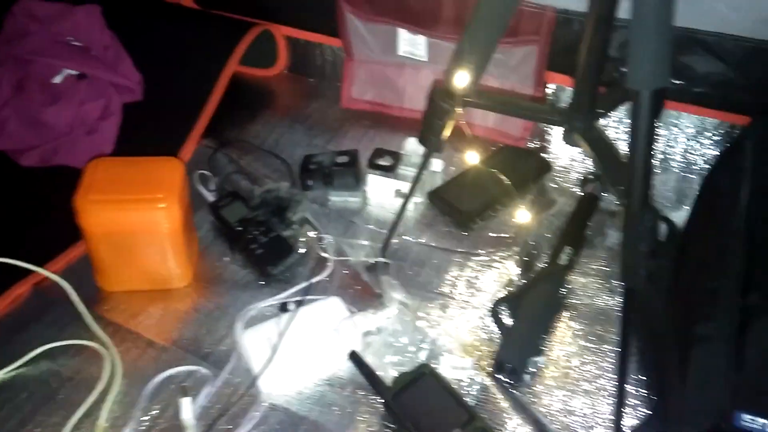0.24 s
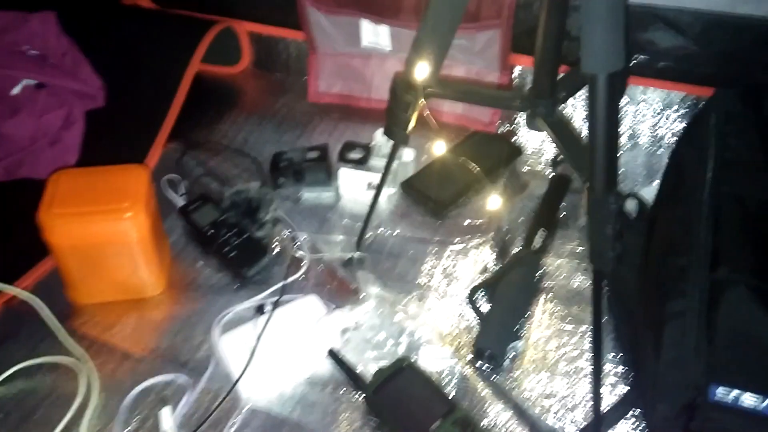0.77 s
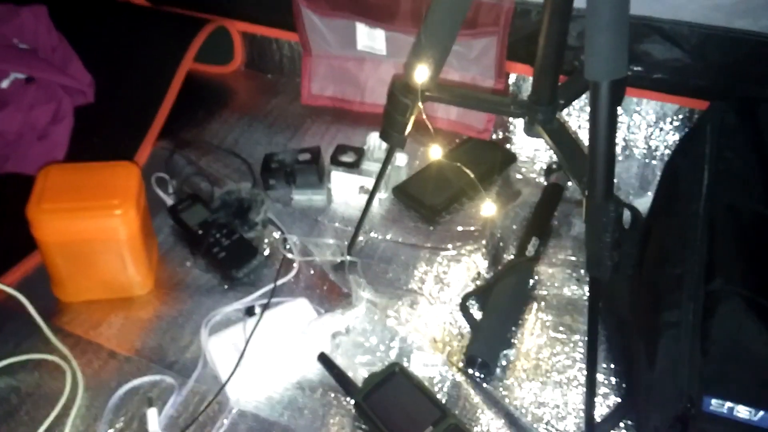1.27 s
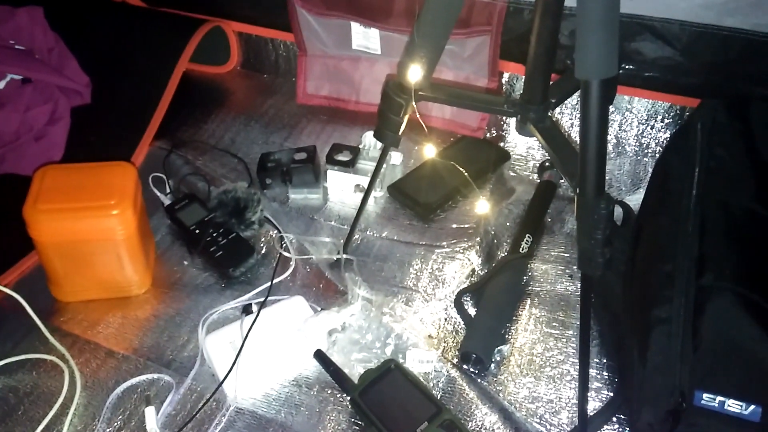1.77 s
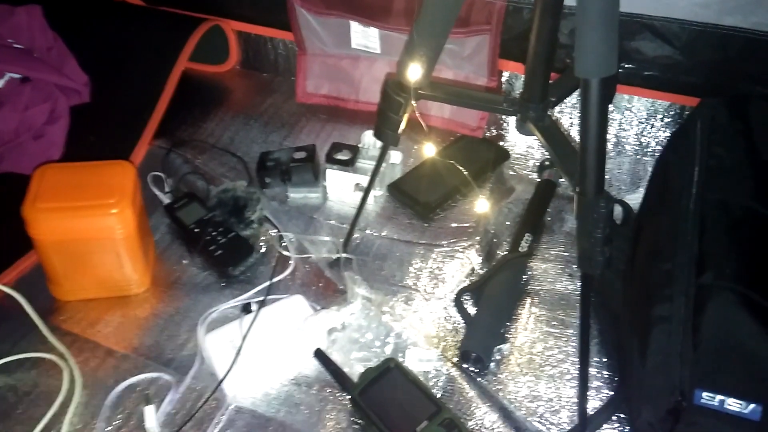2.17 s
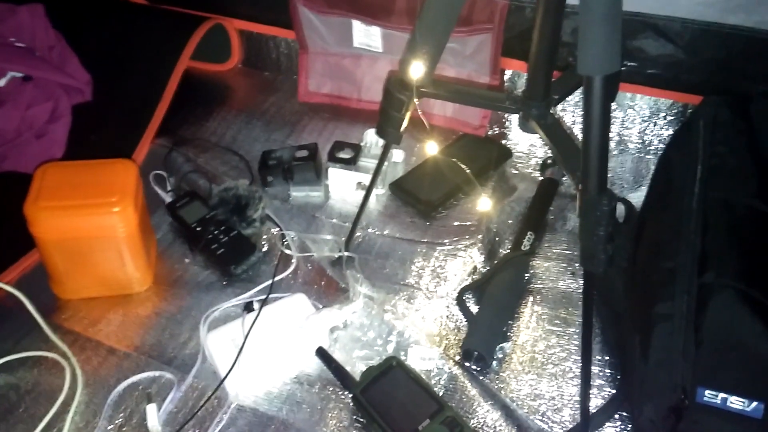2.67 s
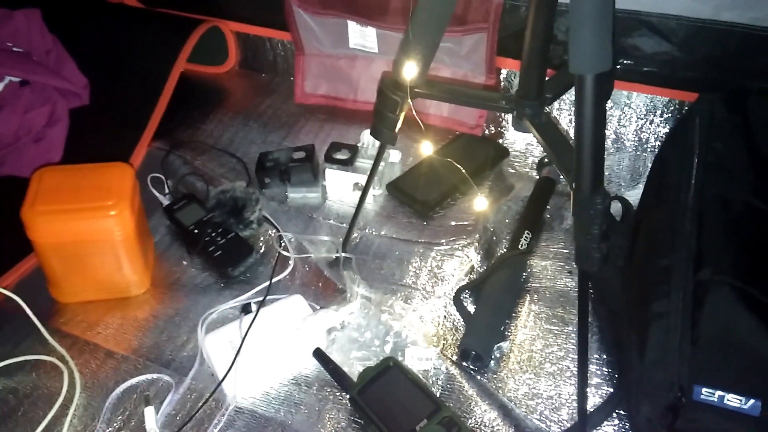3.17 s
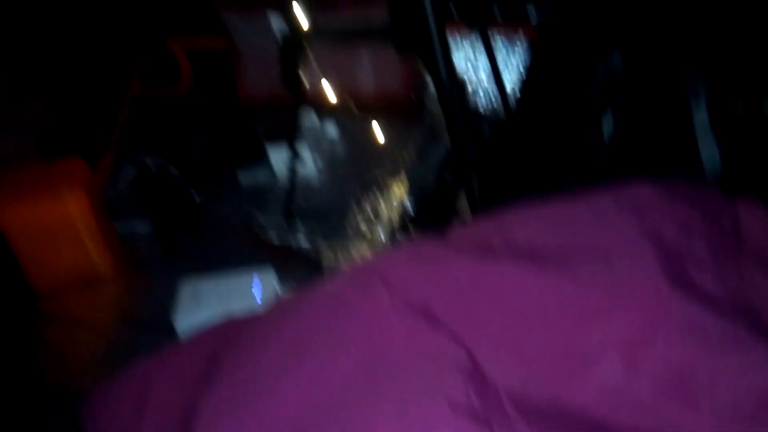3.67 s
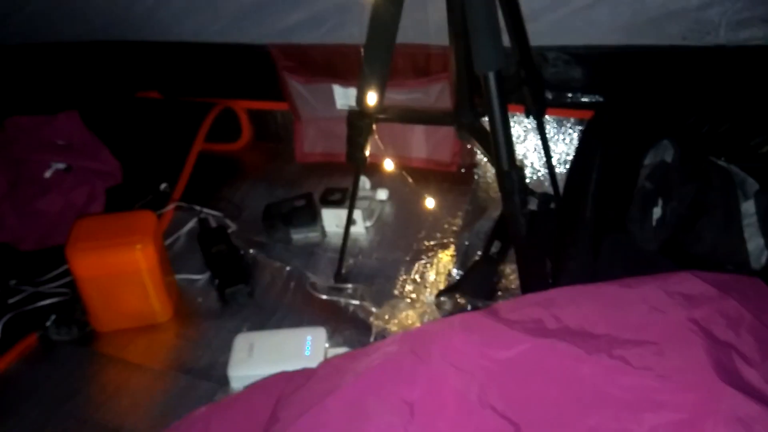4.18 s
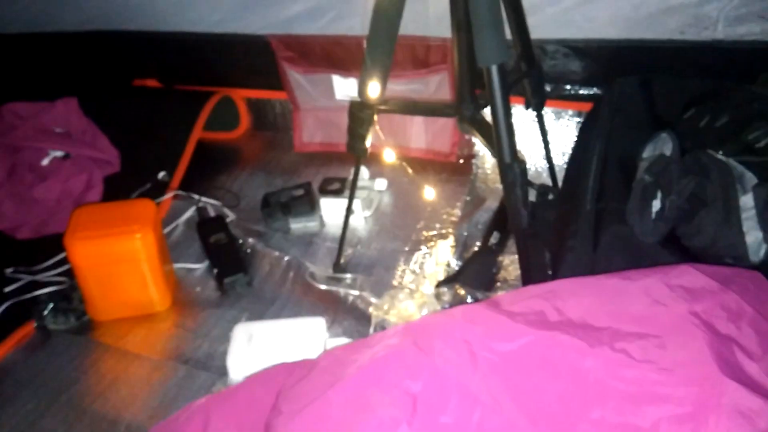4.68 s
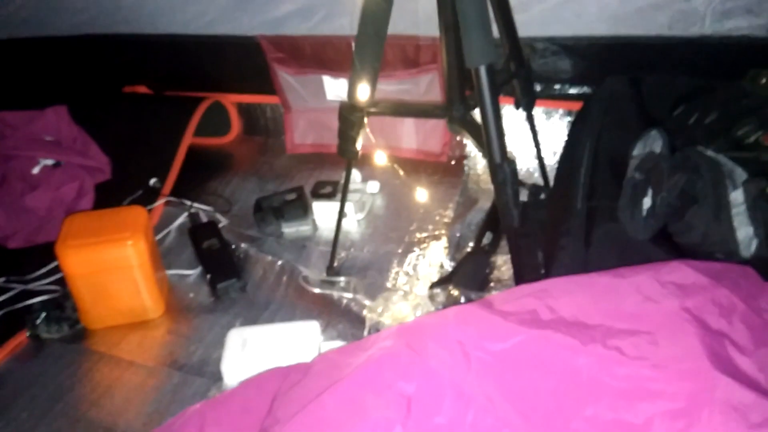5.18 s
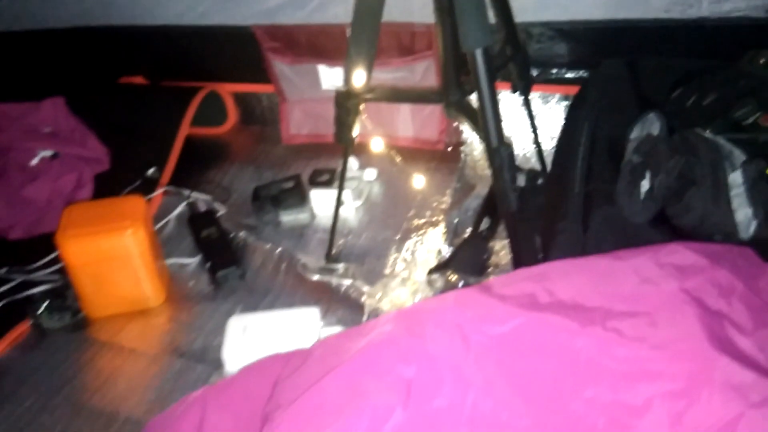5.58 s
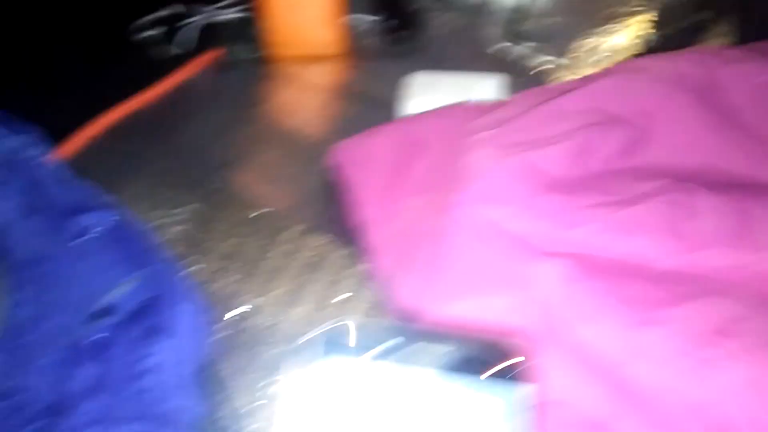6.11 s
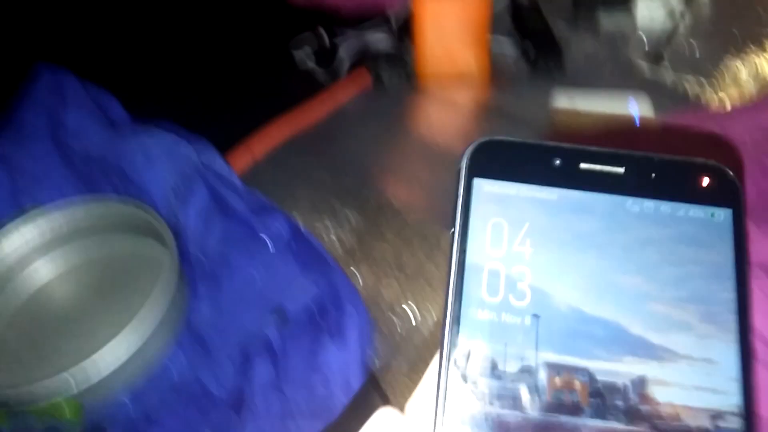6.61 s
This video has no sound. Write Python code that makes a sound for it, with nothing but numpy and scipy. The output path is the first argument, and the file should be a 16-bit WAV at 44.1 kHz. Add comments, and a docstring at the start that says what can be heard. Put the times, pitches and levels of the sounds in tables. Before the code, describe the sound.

From a microphone inside a tent, a downpour beats densely on the outer sheet, mixed with hollow plops from large drops and splashy bursts of spray. It stops abruptly for a moment, then a quieter, smooth rain hiss takes over. Close drips hit the fabric in a quick run of smacks and dull snaps, growing softer over a faint rustle of wet cloth.

```python
"""Rain on a tent at night

From inside, heavy rain drums on the fly, the tent's tight outer sheet. Near drops plop
and tick, and the spray they throw up makes a bright sizzle. The sound breaks off for
half a second and returns as lighter, hissing rain. Now fat drips smack the fabric close
by, making it sag, flutter, snap back and swing."""
import sys
import numpy as np
from scipy import signal
from scipy.fft import rfft, irfft
from scipy.io import wavfile
from scipy.ndimage import uniform_filter1d

SR = 44100
rng = np.random.default_rng(int(sys.argv[2]) if len(sys.argv) > 2 else 0)


def generate_wav(sig):
    """Save sig (samples, or channels by samples) to the path in sys.argv[1] as 16-bit PCM at SR."""
    pcm = np.round(np.clip(np.atleast_2d(sig).T, -1, 1) * 32767).astype(np.int16)
    wavfile.write(sys.argv[1], SR, pcm)


N = 302085
TIME = np.arange(N) / SR
BREAK_START_S, BREAK_END_S = 3.413, 3.934

# How hard the rain drums as gusts come and go. Each row: time in seconds, relative level in dB.
PATTER_LEVEL = [(0, -31), (.21, -31), (.28, -34.5), (.39, -31), (.86, -32), (1.15, -33), (1.33, -31),
                (1.51, -35), (1.65, -30), (1.85, -32.5), (2.27, -32), (2.58, -34), (2.77, -31),
                (2.86, -33.5), (3.36, -31)]
# The tone of the fly when drops hit it. Each row: frequency in Hz, relative level in dB.
FLY_TONE = [(25, -27), (55, -2.5), (120, -5), (190, -7), (300, -3.5), (410, -3.5), (580, 0), (980, -2),
            (1250, -7.5), (2100, -8.5), (2850, -7.5), (3300, -11.5), (5000, -14.5), (12000, -34.5)]
# How strongly single drops ring. Each row: pitch in Hz, relative level in dB.
PLOP_STRENGTH = [(250, -3), (320, 2), (410, -5), (580, 0), (980, 1), (1250, -2.5), (1700, -3), (2050, -5.5),
                 (2350, -4), (2650, -5.5), (2900, -1.5), (3300, -9.5), (5000, -5.5)]
# Sheets of water hitting the fly. Each row: start in seconds, length in seconds, relative level in dB.
SPLASHES = [(0, 0.052, -35.5), (0.22, 0.071, -31), (0.358, 0.13, -30), (0.552, 0.024, -27.5),
            (0.614, 0.073, -42), (.82, 0.11, -33), (1.258, 0.29, -31.5), (1.617, 0.028, -28),
            (1.929, 0.031, -28.5), (2.051, 0.073, -32.5), (2.33, 0.059, -32.5), (2.488, .02, -32),
            (2.687, .115, -30.5), (2.965, 0.08, -31.5), (3.106, .02, -30.5), (3.266, .012, -26),
            (3.297, 0.069, -31)]
# The tone of the spray. Each row: frequency in Hz, relative level in dB.
SIZZLE_TONE = [(2000, -29.5), (4500, -19.5), (5600, -10), (6400, -7), (7150, 1), (7600, 0), (8400, -7),
               (9500, -15.5), (10800, -23), (12500, -29.5), (14500, -28.5)]
# The downpour's largest drops. Each row: start in seconds, relative level in dB, plop pitch in Hz.
BIG_DROPS = [(0.159, -15.5, 537), (0.198, -17, 904), (0.449, -18, 390), (0.609, -16.5, 630),
             (0.631, -16.5, 1720), (0.789, -14, 950), (1.304, -17.5, 570), (1.42, -16, 694),
             (1.438, -14, 550), (1.533, -13.5, 643), (1.61, -15, 334), (1.661, -15, 1030),
             (1.939, -18.5, 1590), (2.055, -17, 713), (2.23, -13, 465), (2.479, -15, 674),
             (2.538, -18, 665), (2.728, -16, 630), (3.139, -19.5, 1080), (3.319, -15, 580)]
# The lighter rain eases for a second, then picks up. Each row: time in seconds, hiss level in dB.
HISS_LEVEL = [(3.93, -31), (4.55, -32), (4.85, -30.5), (5.11, -31), (5.17, -34), (5.42, -36), (5.72, -35),
              (5.93, -36), (6.09, -35.5), (6.16, -28), (6.44, -31), (6.85, -31.5)]
# How the lighter rain's tone changes. Each row: time in seconds, centre of the hiss in Hz,
# level of the wash in dB, boost of the highest treble in dB.
LIGHT_RAIN_CHANGES = [(3.93, 5970, -35.5, -0.5), (4.3, 6280, -36, 0), (4.7, 6450, -35, -0.5),
                      (5.05, 6460, -35.5, -2.5), (5.17, 6600, -39.5, 3.5), (5.27, 6960, -50, 1),
                      (6.08, 6920, -51, 2), (6.16, 6960, -46, 1), (6.85, 6900, -47.5, 4)]
# The tone of the hiss when centred on HISS_CENTRE_HZ. Each row: frequency in Hz, relative level in dB.
HISS_TONE = [(2000, -21), (3600, -29), (5000, -21), (5700, -6), (6450, 2), (6950, 5), (7700, 0),
             (8600, -4.5), (10000, -10.5), (12000, -17), (14500, -20.5)]
HISS_CENTRE_HZ = 6900
# The tone of the broad wash under the hiss. Each row: frequency in Hz, relative level in dB.
WASH_TONE = [(25, -2), (55, 11.5), (110, 8), (400, -2), (1000, -2.5), (2500, 1), (3500, 2.5), (4600, 4.5),
             (5600, 6.5), (7000, 0), (9000, -29), (14000, -18)]
# Fat drips landing on the fly. Each row: start in seconds, smack in dB, length of the sag in seconds,
# flutter in dB, snap in dB, swing in dB. All four levels are relative.
DRIPS = [(4.044, -10, 0.0058, -46, -52, -48), (4.1778, -14.5, 0.017, -29.5, -14, -33),
         (4.3156, -14, 0.012, -34, -25, -36), (4.4448, -16.5, 0.013, -35, -39, -37),
         (4.5623, -17, 0.015, -25.5, -26, -34), (4.6926, -16, .0138, -43, -22, -31),
         (4.8337, -14.5, 0.017, -41, -17, -41), (4.976, -13.5, 0.036, -34.5, -34, -33),
         (5.1345, -18, 0.051, -40.5, -19, -39), (5.3346, -25, .0138, -41.5, -30, -41),
         (5.5623, -22.5, 0.026, -43, -22, -33), (5.646, -34, 0.0049, -47, -35, -36),
         (5.8064, -26, 0.014, -45, -22.5, -35), (5.8597, -28, .0316, -50, -28.5, -38),
         (5.9384, -35, 0.026, -51, -28, -36), (6.0453, -36, 0.0027, -55, -42, -39),
         (6.253, -39, .003, -55, -50, -45), (6.3012, -43, 0.016, -58, -27, -44),
         (6.666, -33, 0.0019, -52, -39, -37), (6.7786, -37, 0.0087, -47, -55, -59)]
# Slack fabric flapping with no drip on it. Each row: start in seconds, snap and swing in relative dB.
LONE_FLAPS = [(5.4213, -29.5, -34.5), (5.606, -23.5, -33), (6.1094, -35, -41), (6.1874, -27, -43),
              (6.5574, -51, -36), (6.616, -46, -34.5)]


def from_db(db):
    """Turn decibels into a number to multiply a sound by."""
    return 10 ** (np.asarray(db) / 20)


def rms_one(x):
    """Scale a sound so its average strength (rms) is 1."""
    return x / np.sqrt(np.mean(x ** 2) + 1e-20)


def in_time(rows):
    """Join a table's rows with straight lines, giving each column a value at every sample."""
    times, *columns = np.transpose(rows)
    return [np.interp(TIME, times, column) for column in columns]


def at_hz(tone, hz):
    """Look up a tone table's level in dB at the given frequencies."""
    points, db = np.transpose(tone)
    return np.interp(np.log(np.maximum(hz, 1)), np.log(points), db)


def add(out, start_s, sound):
    """Mix a short sound into out at the given time."""
    part = out[round(start_s * SR):][:len(sound)]
    part += sound[:len(part)]


def drift(rate):
    """A smooth random wobble of strength 1; a higher rate makes it quicker."""
    count = int(6 * rate * N / SR) + 4
    smooth = np.convolve(rng.standard_normal(N // 20)[:count], np.hanning(7), "same")
    return rms_one(np.interp(np.linspace(0, count - 1, N), np.arange(count), smooth))


def through(x, response):
    """Make every click in x set off a copy of the response."""
    return signal.oaconvolve(x + 1e-18, response)[:N]


def body(tone, size=4096):
    """The short sound that something with this tone makes when tapped once."""
    hz = np.arange(size // 2 + 1) * SR / size
    cepstrum = irfft(np.log(from_db(at_hz(tone, hz))))
    # fold the second half onto the first, so nothing sounds before the tap
    cepstrum[1:size // 2] *= 2
    cepstrum[size // 2 + 1:] = 0
    response = irfft(np.exp(rfft(cepstrum)))
    return response / np.linalg.norm(response)


def shower(per_s, spread_db):
    """Clicks at random times, like falling drops; spread_db sets how much their sizes vary."""
    sizes = from_db(spread_db * np.minimum(rng.exponential(1, N), 2.15))
    return sizes * rng.choice([-1, 1], N) * (rng.random(N) < per_s / SR)


def swing(hz, t60, size=8192):
    """A swing that comes to rest. Here and below, t60 is the seconds it takes to fade by 60 dB."""
    return np.sin(2 * np.pi * hz * TIME[:size]) * from_db(-60 * TIME[:size] / t60)


def fabric_tap(t60, ring_db, size=4096):
    """One spot on the fly is hit: a click, then the fabric's short, uneven ringing."""
    tail = rng.standard_normal(size) * from_db(-60 * TIME[:size] / t60)
    response = from_db(ring_db) * tail / np.linalg.norm(tail)
    response[0] += 1
    return response / np.linalg.norm(response)


def patter(spots=12):
    """Countless drops drum on different spots of the fly, the nearer ones as separate plops."""
    level_db, = in_time(PATTER_LEVEL)
    drops = shower(per_s=900, spread_db=3.0)
    spot = rng.integers(0, spots, N)
    taps = sum(through(drops * (spot == k), fabric_tap(t60=0.054, ring_db=-0.5)) for k in range(spots))
    drumming = rms_one(through(taps, body(FLY_TONE)))
    return from_db(level_db - 3.0) * drumming + from_db(level_db - 2.5) * plops()


def ring(clicks, hz, t60):
    """Each click starts a pure note that dies away."""
    decay = from_db(-60 / (t60 * SR))
    angle = 2 * np.pi * hz / SR
    return signal.lfilter([0, np.sin(angle)], [1, -2 * decay * np.cos(angle), decay ** 2], clicks + 1e-18)


def plops(t60_at_1khz=0.061, count=56):
    """Each drop rings at one of many pitches; low plops last longer than high ticks."""
    pitches = np.geomspace(250, 5000, count) * np.exp(rng.normal(0, .01, count))
    drops = shower(per_s=1000, spread_db=5.5)
    chosen_pitch = rng.integers(0, count, N)
    out = np.zeros(N)
    for k, hz in enumerate(pitches):
        t60 = t60_at_1khz * (1000 / hz) ** 0.2
        gain = from_db(at_hz(PLOP_STRENGTH, hz)) / np.sqrt(t60)
        out += gain * ring(drops * (chosen_pitch == k), hz, t60)
    return rms_one(signal.sosfilt(signal.butter(2, 200, "high", fs=SR, output="sos"), out))


def splash_strength(rise_s=0.0023, sink_db_per_s=13.5, t60=0.14):
    """Each splash jumps up, sinks while it lasts and dies away; small spatters land at random."""
    spatter = from_db(-35.5 - 60 * TIME[:SR // 4] / 0.1)
    power = through(np.abs(shower(per_s=21, spread_db=2.0)), spatter ** 2)
    for start_s, length_s, db in SPLASHES:
        age = np.maximum(TIME - start_s, 0)
        fall_db = sink_db_per_s * age + 60 * np.clip(age - length_s, 0, 1) / t60
        power += (np.minimum(age / rise_s, 1) * from_db(db - fall_db)) ** 2
    return np.sqrt(np.abs(power))


def sizzle(steady_db=-32.5):
    """Fine spray thrown up by the drops comes in quick clumps and swells with each splash."""
    spray = through(shower(per_s=20000, spread_db=2.5), body(SIZZLE_TONE))
    strength = np.hypot(from_db(steady_db), splash_strength())
    return strength * rms_one(spray * from_db(0.85 * drift(rate=30)))


def big_drops():
    """A large drop gives a dull tap on the fly, a hollow plop and a wet splat."""
    taps, rings, splats = np.zeros((3, N))
    for start_s, db, hz in BIG_DROPS:
        add(taps, start_s + 0.0018, from_db(db + 9.5) * fabric_tap(t60=0.05, ring_db=2.5))
        add(rings, start_s + 0.003, from_db(db - 9.0) * swing(hz, t60=0.043))
        add(splats, start_s + 0.002, from_db(db + 11.0) * fabric_tap(t60=0.068, ring_db=7.0))
    dull = signal.butter(2, 1500, fs=SR, output="sos")
    wet = signal.butter(2, [1400, 2300], "band", fs=SR, output="sos")
    return signal.sosfilt(dull, through(taps, body(FLY_TONE))) + rings + signal.sosfilt(wet, splats)


def light_rain():
    """A smooth, far hiss creeps up in pitch, over a broad wash of drops that ebbs away."""
    centre_hz, wash_db, boost_db = in_time(LIGHT_RAIN_CHANGES)
    hiss_db, = in_time(HISS_LEVEL)
    # cut noise into short slices, so each can have its own tone
    hz, times, slices = signal.stft(rng.standard_normal(N), SR, nperseg=256)
    pitch_ratio = np.interp(times, TIME, centre_hz) / HISS_CENTRE_HZ
    treble_db = np.interp(hz, [7500, 12000], [0, 1])[:, None] * np.interp(times, TIME, boost_db)
    tone_db = at_hz(HISS_TONE, hz[:, None] / pitch_ratio) + treble_db
    hiss = signal.istft(slices * from_db(tone_db), SR)[1][:N]
    hiss = rms_one(hiss * from_db(0.85 * drift(rate=27)))
    wash = rms_one(through(shower(per_s=12000, spread_db=3.0), body(WASH_TONE)))
    return from_db(hiss_db) * hiss + from_db(wash_db) * wash


def stirring(rustle_db=-51.5, fade_db_per_s=1.5, billow_db=-53.0):
    """The wet fabric keeps rustling, ever more softly, while a slack panel billows."""
    band = signal.butter(1, [120, 650], "band", fs=SR, output="sos")
    dull = signal.butter(2, 1200, fs=SR, output="sos")
    rustle = signal.sosfilt(np.vstack([band, dull]), shower(per_s=700, spread_db=-1.0))
    billow = through(shower(per_s=60, spread_db=1.5), swing(hz=78, t60=0.029))
    rustle = rms_one(rustle * from_db(4.4 * drift(rate=10)))
    fading = from_db(rustle_db - fade_db_per_s * (TIME - BREAK_END_S))
    return fading * rustle + from_db(billow_db) * rms_one(billow)


def pulse(rise_s, size=512):
    """One brief push on the air, reaching height 1 after rise_s seconds."""
    age = TIME[:size] / rise_s
    return (age * np.exp(1 - age)) ** 2


def drips(firm_db=-16.5):
    """Each drip flattens with a smack, sharper if it hits harder; the fabric then swings the other way."""
    out = np.zeros(N)
    for start_s, db, *_ in DRIPS:
        rise_s = 0.00012 * from_db(-0.5 * (db - firm_db))
        add(out, start_s - rise_s, from_db(db + 0.5) * pulse(rise_s))
        add(out, start_s, -from_db(db - 12.0) * swing(hz=123, t60=0.024))
    return out


def flutters(quiet_share=0.22):
    """Wet fabric starts to rattle partway through its sag under a drip, growing until it pulls tight."""
    strength = np.zeros(N)
    for start_s, _, sag_s, db, *_ in DRIPS:
        span_s = [start_s + quiet_share * sag_s, start_s + sag_s]
        strength += from_db(db) * np.interp(TIME, span_s, [0.6, 1.3], left=0, right=0)
    band = signal.butter(1, [380, 800], "band", fs=SR, output="sos")
    dull = signal.butter(2, 2800, fs=SR, output="sos")
    rattle = signal.sosfilt(np.vstack([band, dull]), rng.standard_normal(N))
    return uniform_filter1d(strength, size=40) * rms_one(rattle)


def flaps(typical_hz=65, pitch_scatter=0.11):
    """After a sag, or on its own, the fabric snaps tight with a dull pulse and a slow swing."""
    out = np.zeros(N)
    rebounds = [(s + sag_s, snap_db, swing_db) for s, _, sag_s, _, snap_db, swing_db in DRIPS]
    for start_s, snap_db, swing_db in rebounds + list(LONE_FLAPS):
        hz = typical_hz * np.exp(pitch_scatter * rng.standard_normal())
        add(out, start_s - 0.0004, -from_db(snap_db - 3.5) * pulse(rise_s=0.00071))
        add(out, start_s + 0.0013, from_db(swing_db + 6.5) * swing(hz, t60=0.077))
    return out


def scene():
    """The downpour, a silent break, then lighter rain with drips; both ears hear the same."""
    fade_out = np.exp(-np.clip((TIME - BREAK_START_S) / 0.0018, 0, 30))
    fade_in = np.clip((TIME - BREAK_END_S) / 0.002 + 0.5, 0, 1)
    heavy = patter() + big_drops() + sizzle()
    light = light_rain() + drips() + flaps() + flutters() + stirring()
    return np.tile(fade_out * heavy + fade_in * light, (2, 1))


def record(dry, lowest_hz=36, highest_hz=14300):
    """The microphone loses the deepest bass, and the highest treble is cut off."""
    thinned = signal.sosfilt(signal.butter(2, lowest_hz, "high", fs=SR, output="sos"), dry)
    return signal.sosfilt(signal.ellip(12, .1, 80, highest_hz, fs=SR, output="sos"), thinned)


dry = scene()
out = record(dry)
generate_wav(out)
```